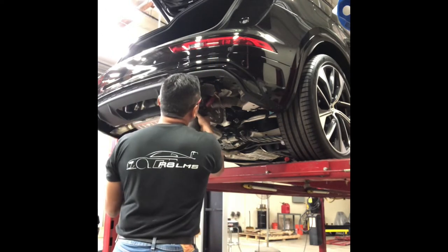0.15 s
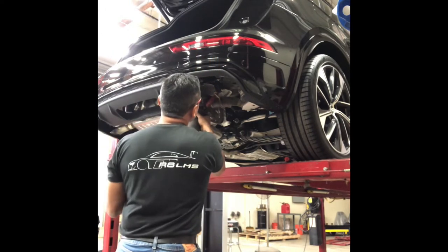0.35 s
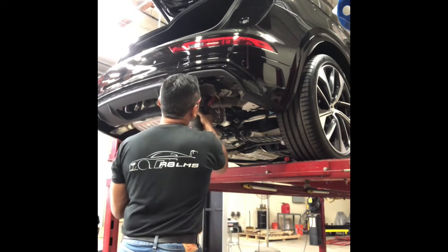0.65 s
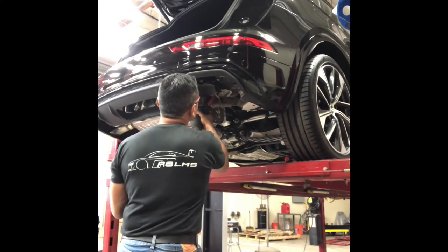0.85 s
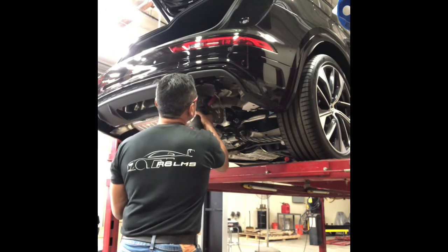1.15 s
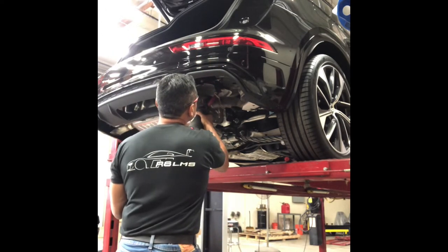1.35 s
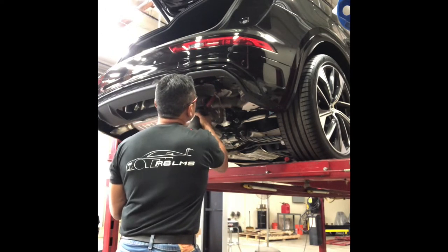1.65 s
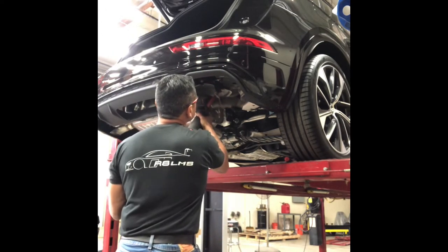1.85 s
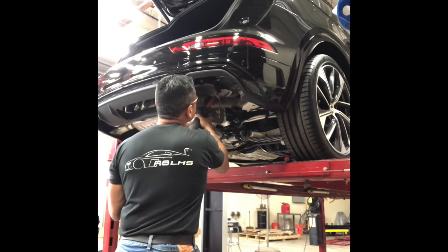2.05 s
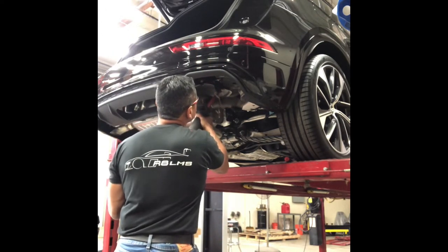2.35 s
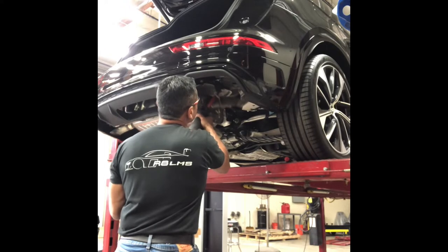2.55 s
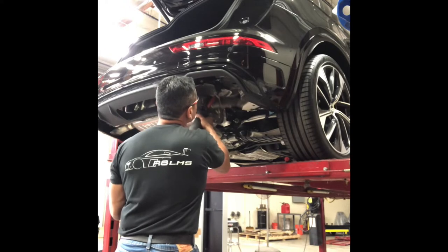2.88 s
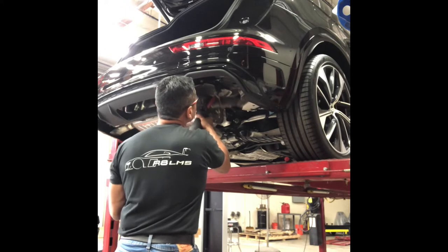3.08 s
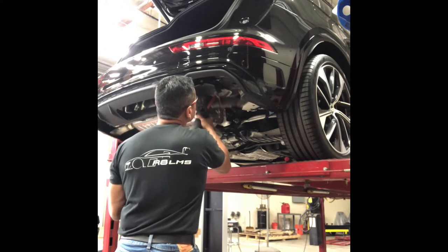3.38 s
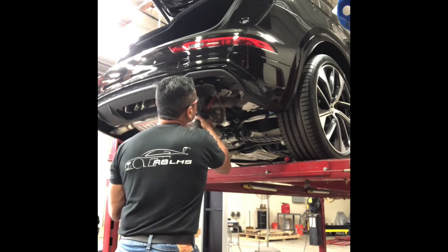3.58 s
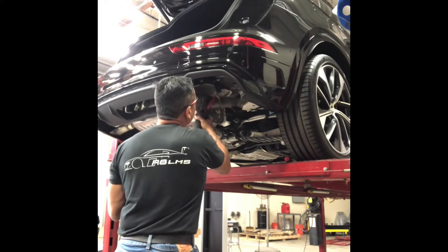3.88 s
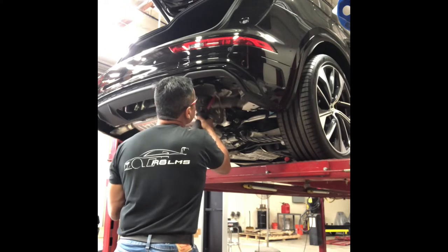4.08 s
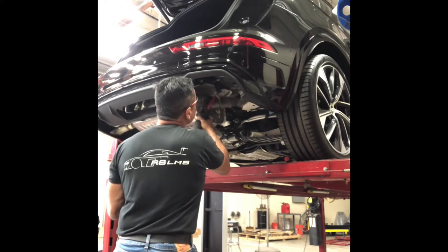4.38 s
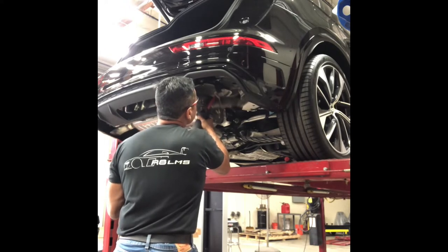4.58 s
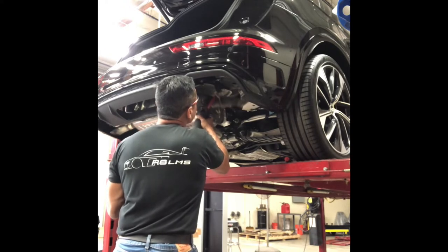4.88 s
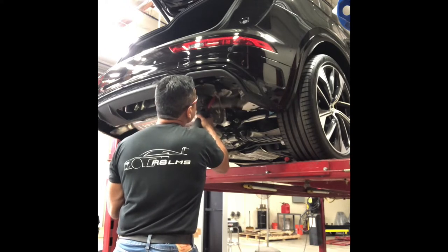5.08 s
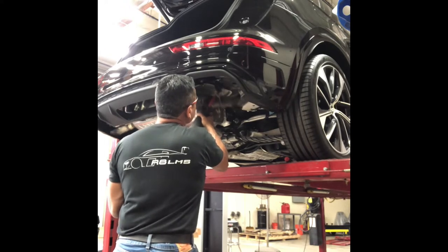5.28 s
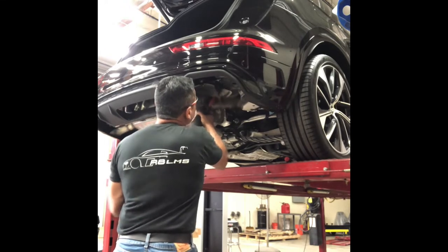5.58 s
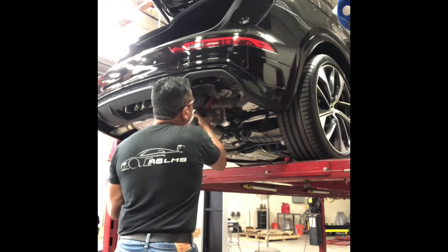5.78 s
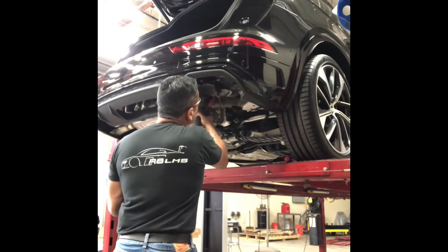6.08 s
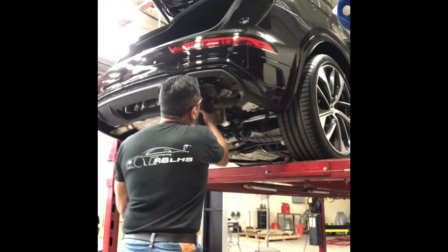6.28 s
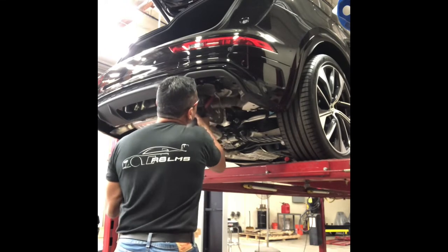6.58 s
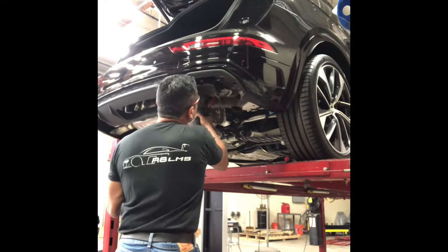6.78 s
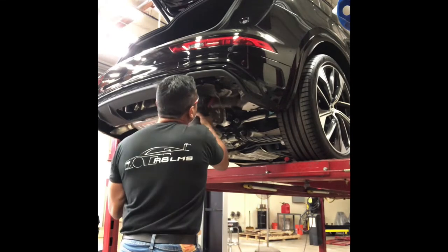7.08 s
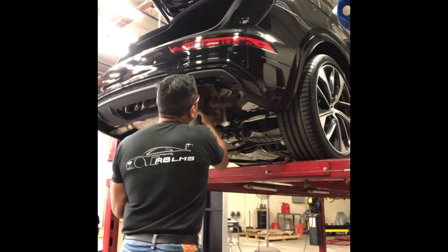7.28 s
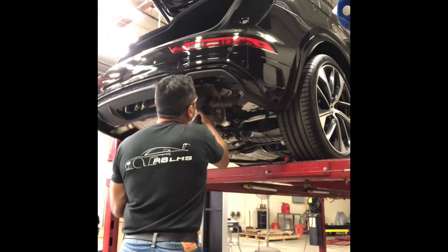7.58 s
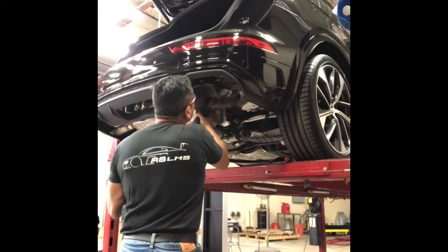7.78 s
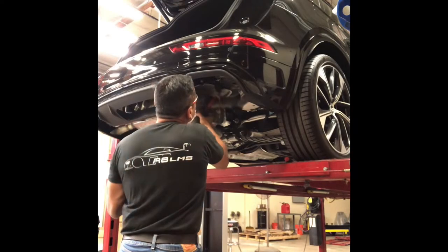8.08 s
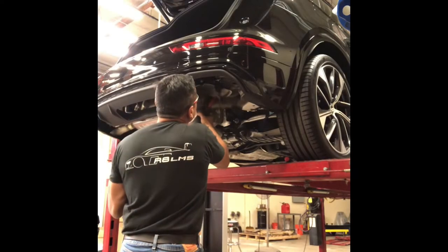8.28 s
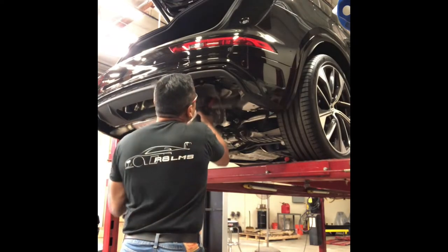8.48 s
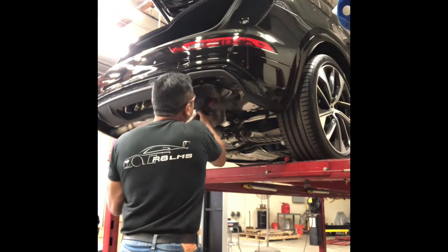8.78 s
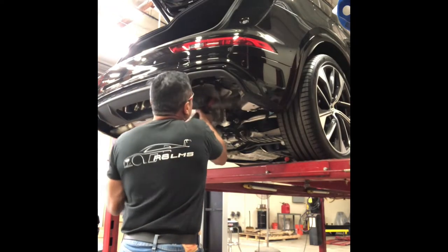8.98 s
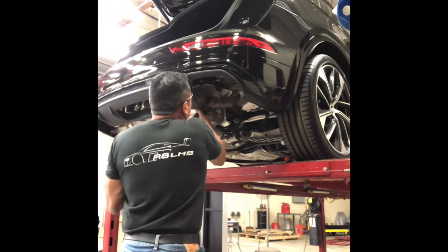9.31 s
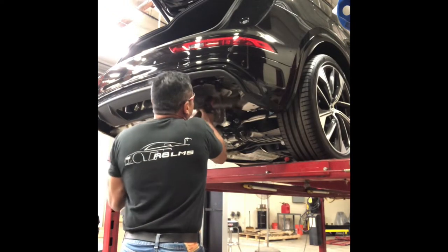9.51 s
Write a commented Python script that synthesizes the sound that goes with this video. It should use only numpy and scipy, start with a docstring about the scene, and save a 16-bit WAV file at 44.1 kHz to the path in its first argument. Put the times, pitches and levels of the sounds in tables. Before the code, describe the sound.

A reciprocating saw speeds up and rasps through a ringing steel exhaust pipe, which later rattles and knocks, over a workshop hum.

```python
"""Reciprocating saw on an exhaust pipe.

A machine hums in a workshop. Under a car, a saw whines, clacks and runs up to about 45 strokes a second.
Its teeth rasp the ringing steel pipe, biting and slipping; its gears drone. The pinched blade squeals.
As the cut deepens the loosened pipe swings about 14 times a second, snags the teeth,
knocks against the saw and shakes the underbody."""
import sys
import numpy as np
from scipy import signal
from scipy.fft import rfft, irfft, next_fast_len
from scipy.io import wavfile
from scipy.ndimage import uniform_filter1d, minimum_filter1d, map_coordinates

SR = 44100
rng = np.random.default_rng(int(sys.argv[2]) if len(sys.argv) > 2 else 0)


def wrap_up_sound(samples):
    """Save the sound to the file named by the first command line argument, as 16-bit audio."""
    columns = np.atleast_2d(samples).T
    # keep every value between -1 and 1, then stretch to whole-number steps
    tamed = np.clip(columns, -1, 1)
    steps = np.round(tamed * 32767).astype(np.int16)
    wavfile.write(sys.argv[1], SR, steps)


N = 425565
TIME_S = np.arange(N) / SR

# Machine hum. Each row: frequency in Hz, rms level in dB.
HUM_TONES = [(91.5, -54), (161.5, -64.5), (269.2, -64.5), (479.1, -62), (1556, -67)]
# Spectral shapes. Each row: frequency in Hz, relative level in dB.
HALL_AIR_SPECTRUM = [(25, -46), (60, -32), (90, -26), (121, -25), (160, -10), (215, -12.5), (270, -20.5),
                     (354, -8), (415, -15.5), (488, -21), (560, -20), (1580, -22), (5000, -43),
                     (15000, -53)]
RASP_SPECTRUM = [(1500, -21.5), (3300, 4), (4000, 0), (5300, -7), (7000, 0.5), (7800, -2.5), (9500, -6),
                 (11500, -2), (14200, -6), (15400, -9.5)]
UNDERBODY_SPECTRUM = [(25, -42), (100, -22), (200, -14.5), (330, -8.5), (430, -4.5), (520, 2.5), (600, 1),
                      (680, 3.5), (780, -5), (950, -3.5), (1300, -46), (2200, -84)]
# Hall decay. Each row: frequency in Hz, T60 in seconds.
HALL_T60 = [(200, 0.53), (2000, 0.69), (12000, 0.18)]
# Resonances. Each row: frequency in Hz, bandwidth in Hz, relative level in dB.
CLACK_MODES = [(473, 39, 1), (1330, 120, 3), (2050, 73, -2), (2440, 260, -10), (3900, 160, -17),
               (4750, 34, -18), (5200, 93, -11.5), (5900, 29, -16)]
PIPE_MODES = [(1595, 22.7, 0.5), (1704, 15.3, -1.5), (1754, 42, 2), (1845, 93, -1), (1965, 31, 0.5),
              (2115, 63, 0.5), (2178, 49, -2), (2282, 46, -2), (2328, 23, 0.5), (2414, 77, -4.5),
              (2622, 57, -2), (2676, 105, -3), (2842, 114, -5), (2946, 26, -4.5), (3054, 47, -1.5),
              (3320, 89, -11.5)]
WALL_MODES = [(1053, 30.5, -10.0), (1115, 20, -5), (1200, 68, -6.5), (1244, 36, -3.5), (1364, 45, -3.5),
              (1385, 21.7, 3.5), (1473, 119, -5)]
BLADE_MODES = [(3954, 68, -3), (4224, 48, -3), (4540, 86, -1.5), (4895, 250, -2.5), (5055, 84, 1.5),
               (5300, 116, 2), (5920, 710, -3), (6050, 112, 3.5), (6250, 100, -3), (6950, 390, -9.5),
               (8570, 530, -6), (8890, 220, -2.5), (9440, 93, -5), (10800, 854, -12.5), (13480, 280, -9.5),
               (16360, 1400, -10)]
SINGING_MODES = [(2243, 34, 8.5), (2510, 44, -3), (3113, 45, 6), (6170, 100, -7), (8880, 120, -14),
                 (12950, 90, -14), (15200, 200, -19)]  # blade held only at its edge
AIR_COLUMN_MODES = [(177, 27, 0), (210, 21, 0), (314, 44, -6)]  # air inside the pipe
# Saw speed. Each row: time in seconds, strokes per second.
STROKE_RATE = [(.52, 28), (.7, 31.5), (1.0, 36), (1.2, 41.5), (1.45, 45.2), (2.4, 46.2), (4.2, 46.3),
               (5.4, 45), (6.1, 48.2), (7.1, 44), (9.6, 42.8)]
# Feed pressure. Each row: time in seconds, relative ring level in dB, rasp offset in dB.
FEED = [(0.54, -23, -9.5), (0.73, -22.5, -10.5), (0.84, -16, -11), (1.12, -21, -8.5), (1.25, -14.5, -12),
        (1.48, -14.5, -12), (1.6, -19, -7), (2.75, -20.5, -7.5), (3.15, -22.5, -7), (4.1, -18.5, -6.5),
        (4.38, -12.5, -5), (5.5, -13.5, -4.5), (6.0, -26.5, -6.5), (6.33, -15.5, -4.5), (6.62, -28.5, -5),
        (6.93, -18.5, -4.5), (7.0, -13.5, -3), (8.5, -17.5, -1.5), (9.65, -15, 0.5)]
# Cut progress. Each row: time in seconds, teeth passing per stroke,
# wall flexing in dB, blade singing in dB, both relative to the ring.
CUT_DEPTH = [(.5, 24, -7.5, 1), (1.15, 23.2, -8.5, -8.5), (1.4, 24.3, -11, 1), (1.65, 24, -6.5, -6),
             (1.82, 23.8, -9, -4), (1.95, 22, -10, -9), (3.0, 23.2, -7, -8), (4.2, 19.6, -5, -16),
             (5.3, 14.8, -5.5, -16), (6.2, 14.2, -7.5, -18), (7.3, 12.24, -6.5, -31), (9.6, 12.25, -9, -30)]
# Uneven hand pressure, until the groove guides the saw. Each row: time in seconds, spread in dB.
HAND_SHAKE = [(3, 1.18), (4.3, 0.6)]
# Gear tones. Each row: multiple of the stroke rate, rms level in dB.
GEAR_ORDERS = [(3.44, -57), (4, -60.5), (5, -59.5), (7, -73), (10, -61.5), (13, -57.5), (15, -62),
               (17, -57)]
# Teeth bite deeper. Each row: centre in seconds, half length in seconds, gain in dB.
DEEP_BITES = [(1.43, .05, 2), (1.779, 0.019, 4.2), (2.564, 0.099, 5.5), (4.39, .05, 1.5), (4.91, .04, 1.5),
              (5.868, .073, 6), (6.067, 0.063, 7.5), (6.817, .032, 2)]
# Blade loses hold. Each row: centre in seconds, half length in seconds, loss in dB.
BLADE_SLIPS = [(2.865, 0.0087, 0), (5.374, .011, 8), (6.154, 0.037, 33), (7.245, 0.023, 20),
               (8.525, 0.062, 5.5), (8.661, 0.016, 3), (9.31, 0.017, 8)]
# One list per squeal. Each row: time in seconds, pitch in Hz, level in dB.
SQUEAL_TRACKS = [
    [(4.55, 1790, -90), (4.62, 1800, -17), (4.85, 1775, -18.5), (5.2, 1791, -23), (5.27, 1800, -90)],
    [(5.295, 1496, -90), (5.308, 1575, -17), (5.333, 1830, -11), (5.345, 2210, -17), (5.36, 2102, -12),
     (5.375, 2000, -90)],
    [(5.622, 1600, -90), (5.634, 1622, -8.5), (5.655, 1570, -13), (5.68, 1520, -90)],
    [(6.95, 1810, -90), (6.98, 1810, -21), (7.14, 1790, -20), (7.17, 1790, -90)],
    [(8.12, 1750, -90), (8.15, 1750, -22), (8.24, 1790, -19), (8.27, 1790, -90)],
    [(8.77, 2447, -90), (8.783, 2470, -13), (8.803, 2470, -14), (8.825, 2480, -90)],
]
# Bouts of pipe swing. Each row: start in seconds, end in seconds, rate in Hz,
# swing depth in dB, boom gain in dB, air column level in dB.
SWING_BOUTS = [(5.196, 5.735, 13.1, 1, 4, -40), (6.166, 6.361, 15.1, 3.5, 8.5, -39),
               (6.637, 6.808, 16.1, 5.5, 4.5, -47), (7.168, 8.253, 13.2, 2, 10.5, -43),
               (8.26, 8.774, 15.38, 3, 13.5, -40.5), (8.76, 9.803, 12.8, 1, 14.5, -41)]
# Teeth snag. Each row: start in seconds, relative level in dB.
TOOTH_SNAGS = [(5.291, -11), (5.557, -13), (5.622, -13), (7.075, -12), (7.143, -12), (7.211, -10),
               (7.365, -10), (7.436, -7), (7.635, -8), (7.856, -8), (7.945, -9), (8.081, -12),
               (8.301, -13.5), (8.414, -10), (8.481, -14.5), (8.682, -7.5), (8.794, -13), (8.883, -12),
               (8.951, -18), (9.107, -8), (9.174, -12), (9.354, -11), (9.465, -11), (9.554, -14.5)]
# Pipe hits the saw's shoe. Each row: time in seconds, relative level in dB, prior lift-off in seconds.
SHOE_KNOCKS = [(5.3834, 1, 0.017), (5.6238, 2, 0.011), (5.819, 0, .004), (5.866, -2, 0.0062),
               (6.1922, -5, 0.004), (6.2282, -6, .005), (6.2684, 2, .016), (6.324, 2, .022),
               (6.3865, -1.5, 0.013), (6.4657, -5, 0.013), (6.559, -8.5, 0.015), (6.663, -6, 0.018),
               (6.7288, -1, .02), (6.7996, 2.5, .022), (6.9197, -9, 0.0076), (7.2595, -6, .01),
               (7.434, 0, .008), (7.7224, 3, 0.0059), (7.805, 4, 0.0077), (8.3454, -6, 0.011),
               (8.412, -8, 0.0092), (8.4778, -13, 0.013), (8.552, 4, 0.014), (8.6831, 1, 0.019),
               (8.772, -2, .008), (8.923, -3, 0.017), (9.1516, -2, .01)]


def amp(db):
    """Decibels to gain."""
    return 10 ** (np.asarray(db) / 20)


def unit_rms(x):
    """Scale to rms 1."""
    return x / np.sqrt(np.mean(x ** 2) + 1e-20)


def at_hz(points, hz):
    """Interpolate (Hz, value) points on a log axis."""
    point_hz, values = np.transpose(points)
    return np.interp(np.log(hz + 1), np.log(point_hz + 1), values)


def curves(rows):
    """One per-sample curve for each column after the time."""
    times_s, *columns = np.transpose(rows)
    return [np.interp(TIME_S, times_s, column) for column in columns]


def wobble(rate_hz, oversample=8):
    """Smooth random curve, spread about 1."""
    knots = rng.standard_normal(int(N * rate_hz / SR) + 4)
    fine = np.arange((len(knots) - 1) * oversample) / oversample
    return np.interp(TIME_S * rate_hz, fine, map_coordinates(knots, [fine]))


def swells_db(rows):
    """Sum of Gaussian level bumps."""
    return sum(db * np.exp(-np.minimum(((TIME_S - s) / half_s) ** 2, 20)) for s, half_s, db in rows)


def coloured(x, spectrum, size=4096):
    """Minimum-phase filter of unit energy."""
    cepstrum = irfft(np.log(amp(at_hz(spectrum, np.fft.rfftfreq(size, 1 / SR))) + 1e-6))
    cepstrum[1:size // 2] *= 2
    cepstrum[size // 2 + 1:] = 0
    impulse = irfft(np.exp(rfft(cepstrum)))
    return signal.fftconvolve(x, impulse / np.linalg.norm(impulse))[:N]


def resonate(x, modes):
    """Bank of damped modes, unit energy overall."""
    t = np.arange(SR // 10) / SR
    impulse = sum((-1) ** k * amp(db) * width * np.exp(-np.pi * width * t) * np.cos(2 * np.pi * hz * t)
                  for k, (hz, width, db) in enumerate(modes))
    return signal.fftconvolve(x, impulse / np.linalg.norm(impulse))[:N]


def bursts(times_s, levels_db, t60_s):
    """Crunching contacts: noise with instant onset and fast decay."""
    out, t = np.zeros(N + SR), np.arange(SR // 5) / SR
    for s, db in zip(times_s, levels_db):
        out[round(s * SR):][:len(t)] += amp(db - 60 * t / t60_s) * rng.standard_normal(len(t))
    return out[:N]


def workshop(air_db=-52.5):
    """Steady machine hum over the rush of air in the hall."""
    hum = sum(np.sqrt(2) * amp(db) * np.sin(2 * np.pi * hz * TIME_S + .12 * wobble(2.65))
              for hz, db in HUM_TONES)
    return hum + amp(air_db) * coloured(rng.standard_normal(N), HALL_AIR_SPECTRUM)


def motor_whine(pitch_hz=1206):
    """The trigger's speed control makes the motor whine: a swell, then a faint steady tone."""
    envelope = amp(-60.5) * np.interp(TIME_S, [.365, .38, .47, .505, .54], [0, 1, 2.2, 4, -.5])
    phase = 2 * np.pi * (pitch_hz * TIME_S + .16 * wobble(200))
    whine = sum(amp(db) * np.sin(k * phase) for k, db in enumerate([0, -13, -12, -4], 1))
    whir = resonate(rng.standard_normal(N), [(1400, 350, -1), (5000, 920, 2)])
    return envelope * (whine + whir)


def hall_echo(x):
    """Diffuse tail, 5 ms late; each frequency decays at its own rate."""
    hz, t, noise = signal.stft(rng.standard_normal(SR // 2), SR, nperseg=256)
    tail = signal.istft(noise * amp(-60 * t / at_hz(HALL_T60, hz)[:, None]), SR, nperseg=256)[1]
    return signal.fftconvolve(np.pad(x, (SR // 200, 0)), tail / np.linalg.norm(tail))[:N]


def first_bite(start_s=.512):
    """The blade jerks against the pipe."""
    clack = resonate(bursts([start_s], [-9], t60_s=.043), CLACK_MODES)
    scratch = coloured(bursts([start_s], [-19], t60_s=.031), RASP_SPECTRUM)
    thud_spectrum = [(100, -27), (230, -10), (340, 0), (480, 5.5), (650, -7), (1500, -27)]
    thud = coloured(bursts([start_s], [-26.5], t60_s=.31), thud_spectrum)
    return clack + scratch + thud


def teeth(strokes, teeth_per_stroke, return_db=-2.5, stroke_scatter_db=.5, tooth_scatter_db=1.5):
    """Teeth bite on the pull and skid on the return. Gives rough force and tooth-rate tone."""
    position = teeth_per_stroke / 2 * np.cos(2 * np.pi * strokes)
    speed = np.abs(np.sin(2 * np.pi * strokes))
    half_stroke = (2 * strokes).astype(int)
    bite = amp(return_db * (half_stroke % 2) + stroke_scatter_db * rng.standard_normal(N)[half_stroke])
    passing = np.diff(np.floor(position), prepend=np.floor(position[0])) != 0
    catches = unit_rms(passing * amp(tooth_scatter_db * rng.standard_normal(N)) * rng.standard_normal(N))
    friction = unit_rms((.71 + .29 * speed) * rng.standard_normal(N))
    pipe_shake = .64 * wobble(260)
    zing = np.sqrt(speed) * np.sin(2 * np.pi * (position + pipe_shake))
    return unit_rms(bite * (catches + 1.93 * friction)), unit_rms(bite ** 2 * zing)


def rattle(rate_hz=34, decay_s=.0077):
    """The pipe bounces on the blade: sudden grips that slacken. Zero mean, rms 1."""
    onsets = (rng.random(N) < rate_hz / SR).astype(float)
    grip = signal.lfilter([1], [1, -np.exp(-1 / (decay_s * SR))], onsets)
    return unit_rms(np.minimum(grip, 1) - grip.mean())


def shimmer(x, t60_s=.016, wet_share=.46, count=3, block=256):
    """Steel's dense high modes: each block of samples excites one of a few short rings."""
    t = np.arange(SR // 30) / SR
    tails = amp(-60 * t / t60_s) * rng.standard_normal((count, len(t)))
    choice = rng.integers(count, size=N)[np.arange(N) // block]
    ring = sum(signal.oaconvolve(x * (choice == k), tail / np.linalg.norm(tail))[:N]
               for k, tail in enumerate(tails))
    return np.sqrt(1 - wet_share) * x + np.sqrt(wet_share) * ring


def wandering_contact(x, spread_db=1.43):
    """The contact moves along the blade, so its high modes flare in turn."""
    spectra = signal.stft(x, nperseg=256)[2]
    patches = uniform_filter1d(rng.standard_normal(spectra.shape), size=5, axis=0)
    patches = uniform_filter1d(patches, size=9, axis=1)
    return signal.istft(spectra * amp(spread_db * unit_rms(patches)), nperseg=256)[1][:N]


def steel(force, zing, wall_db, rasp_db, sing_db):
    """The cutting force rings the pipe, flexes its wall, tears hissing chips and rasps the blade."""
    ring_share = np.interp(TIME_S, [4, 7.3], [.76, .63])  # a buried blade rings less
    scrape = force * amp(rasp_db + .18 * wobble(55))
    chips = shimmer(coloured(scrape * rng.standard_normal(N), RASP_SPECTRUM))
    blade = np.sqrt(ring_share) * resonate(scrape, BLADE_MODES) + np.sqrt(1 - ring_share) * chips
    singing = resonate(force * rng.standard_normal(N) * amp(sing_db + 3.5 * wobble(35)), SINGING_MODES)
    pipe = resonate(force + zing, PIPE_MODES)
    wall = resonate((force + zing) * amp(wall_db), WALL_MODES)
    return pipe + wall + wandering_contact(blade) + singing


def sawing(strokes, start_s=.535, rattle_db=3, boom_ref_db=-46, flex_ref_db=-25):
    """Teeth and knocks drive the steel and the underbody; the teeth also sound the air in the pipe."""
    feed_db, rasp_db = curves(FEED)
    teeth_per_stroke, wall_db, sing_db = curves(CUT_DEPTH)
    swing_db, boom_gain_db, column_db = pipe_swing()
    bite_db = swells_db(DEEP_BITES)
    shake_db = curves(HAND_SHAKE)[0] * wobble(20)
    ring_db = feed_db + bite_db - swells_db(BLADE_SLIPS) + shake_db
    force, zing = teeth(strokes, teeth_per_stroke)
    looseness = np.interp(TIME_S, [5.1, 6.2], [.17, 1])
    grip = (TIME_S > start_s) * amp(rattle_db * looseness * rattle()) * lift_off()
    knock = knocks()

    # Pipe, wall and singing blade share the ring's power.
    split_db = 10 * np.log10(1 + amp(wall_db) ** 2 + amp(sing_db) ** 2)
    pressure = grip * amp(ring_db + swing_db - split_db - 2)
    # The rasp follows swings and bites only in part.
    rasp_db = rasp_db + 2.5 + split_db - .68 * swing_db - .4 * bite_db
    metal = steel(force * pressure + knock, zing * pressure * amp(-16), wall_db, rasp_db, sing_db)

    # The flexing wall shakes the underbody.
    flex_db = ring_db - split_db + wall_db
    boom_db = boom_ref_db + .88 * (flex_db - flex_ref_db) + boom_gain_db
    shaking = (force + amp(-17) * zing) * grip * amp(boom_db)
    boom = coloured(shaking + amp(-16) * knock, UNDERBODY_SPECTRUM)
    column = resonate(force * grip * amp(column_db), AIR_COLUMN_MODES)
    return metal + boom + column


def gear_drive(strokes, waver_db=2):
    """Gears drone at multiples of the stroke rate."""
    drone = sum(np.sqrt(2) * amp(db + waver_db * wobble(2.96)) * np.sin(2 * np.pi * order * strokes)
                for order, db in GEAR_ORDERS)
    return drone * np.interp(TIME_S, [.9, 1.6], [0, 1])


def squeal(waver=.026):
    """The pinched blade sticks and slips at a wavering pitch."""
    out = np.zeros(N)
    for track in SQUEAL_TRACKS:
        hz, db = curves(track)
        out += amp(db) * np.sin(2 * np.pi * np.cumsum(hz * (1 + waver * wobble(270))) / SR)
    return out


def pipe_swing(rise_s=.03, fall_s=.04, lag_cycles=.48, held_column_db=-67, scatter=.52):
    """The loose pipe swings on the blade. Gives pressure swing, boom gain and air column level."""
    swing_db, boom_db, column_db = np.zeros((3, N))
    next_starts_s = [row[0] for row in SWING_BOUTS[1:]] + [np.inf]
    for (start_s, end_s, rate_hz, depth_db, gain_db, air_db), next_s in zip(SWING_BOUTS, next_starts_s):
        # A bout holds until it ends or the next takes over.
        held = np.clip((TIME_S - start_s) / rise_s, 0, 1) - np.clip((TIME_S - next_s) / rise_s, 0, 1)
        bout = held * np.clip(1 - (TIME_S - end_s) / fall_s, 0, 1)
        cycles = rate_hz * (TIME_S - start_s)
        lagging_db = -.88 * depth_db * np.cos(2 * np.pi * (cycles - lag_cycles))
        swing_db -= bout * depth_db * np.cos(2 * np.pi * cycles)
        boom_db += bout * (gain_db + lagging_db)
        column_db += bout * (air_db - held_column_db + lagging_db)
    return swing_db * (1 + scatter * wobble(24)), boom_db, held_column_db + column_db


def snags(gain_db=-3.5, from_hz=1480, rise_s=.0036, fall_s=.026, stroke_s=.0225, deep_cut_s=7):
    """Teeth dig in: falling chirps that the wall radiates down to its lowest mode."""
    out, t = np.zeros(N + SR), np.arange(SR // 30) / SR
    envelope = (t / rise_s) ** 2 * np.exp(2 - 2 * t / rise_s)
    # In the deep cut, each swing adds a light snag.
    swings_s = [s for start_s, end_s, rate_hz, *_ in SWING_BOUTS if start_s > deep_cut_s
                for s in np.arange(start_s + .3 / rate_hz, end_s, 1 / rate_hz)]
    catches = list(TOOTH_SNAGS) + [(rng.normal(s, .005), rng.normal(-18, 3)) for s in swings_s]
    repeats = [(s + stroke_s, db - 7) for s, db in catches]  # same burr, next stroke
    for s, db in catches + repeats:
        hz = from_hz * np.exp(.11 * rng.standard_normal() - t / fall_s * rng.uniform(.695, 1.24))
        radiation = amp(at_hz([(500, -16), (900, -20), (1080, 6.5)], hz))
        chirp = np.sin(2 * np.pi * np.cumsum(hz) / SR)
        out[round(s * SR):][:len(t)] += amp(db + gain_db) * envelope * radiation * chirp
    return out[:N] * (1 + .34 * wobble(1100))  # uneven tooth depth


def lift_off(lift_db=-12):
    """Cutting force gain: the pipe swings clear of the teeth before each knock."""
    lifted = sum(np.interp(TIME_S, [s - clear_s, s - clear_s / 2, s, s + 1 / SR], [0, 1, 1, 0])
                 for s, _, clear_s in SHOE_KNOCKS)
    return amp(lift_db * lifted)


def knocks():
    """Force of the pipe striking the saw's shoe: a crunch plus a sharp crack."""
    times_s, levels_db, _ = np.transpose(SHOE_KNOCKS)
    return bursts(times_s, levels_db - 13, t60_s=.066) + bursts(times_s, levels_db - 12, t60_s=.011)


def scene(echo_db=-10):
    """Saw, its echo and the workshop; mono."""
    strokes = np.cumsum(curves(STROKE_RATE)[0]) / SR
    saw = sawing(strokes) + gear_drive(strokes) + motor_whine() + first_bite() + snags() + squeal()
    return (saw + amp(echo_db) * hall_echo(saw) + workshop())[None]


def record(dry, ceiling=.81, cutoff_hz=15850):
    """Fast peak limiter, then a steep low-pass."""
    needed_gain = np.minimum(1, ceiling / (np.abs(dry[0]) + 1e-9))
    gain = uniform_filter1d(minimum_filter1d(needed_gain, size=200), size=200)
    size = next_fast_len(N + SR // 2, True)
    low_pass = np.clip((cutoff_hz - np.fft.rfftfreq(size, 1 / SR)) / 200 + .5, 0, 1)
    return irfft(rfft(dry[0] * gain, size) * low_pass, size)[None, :N]


dry = scene()
out = record(dry)
wrap_up_sound(out)
```